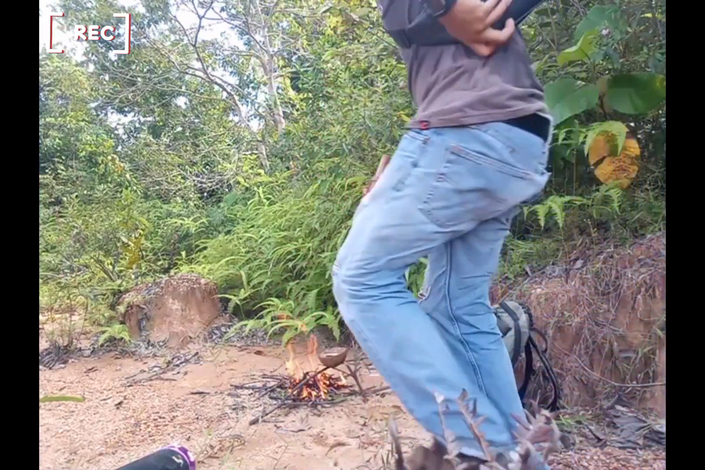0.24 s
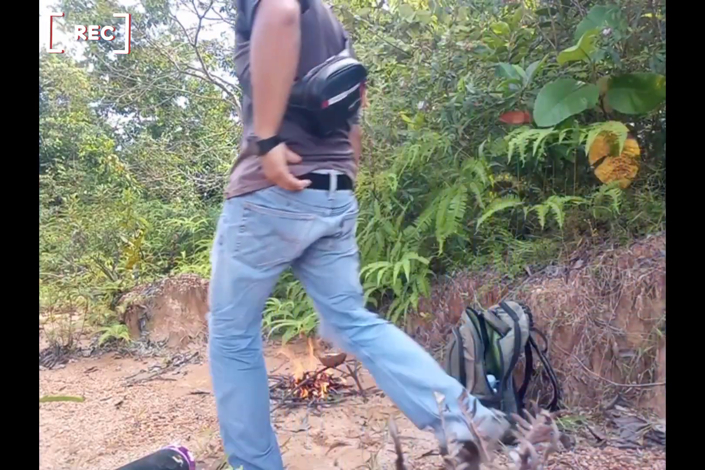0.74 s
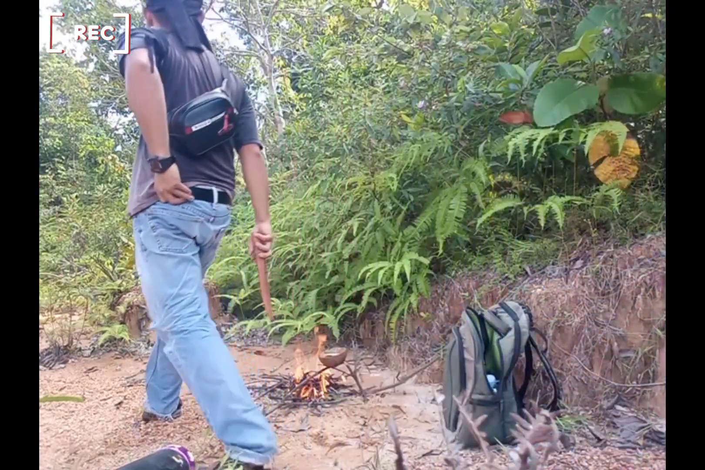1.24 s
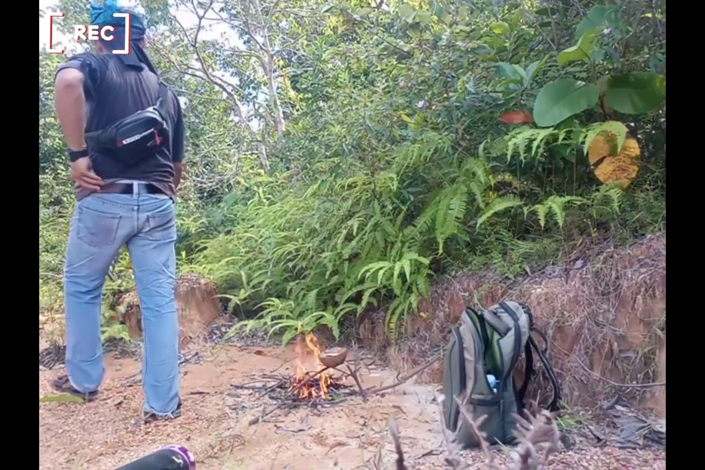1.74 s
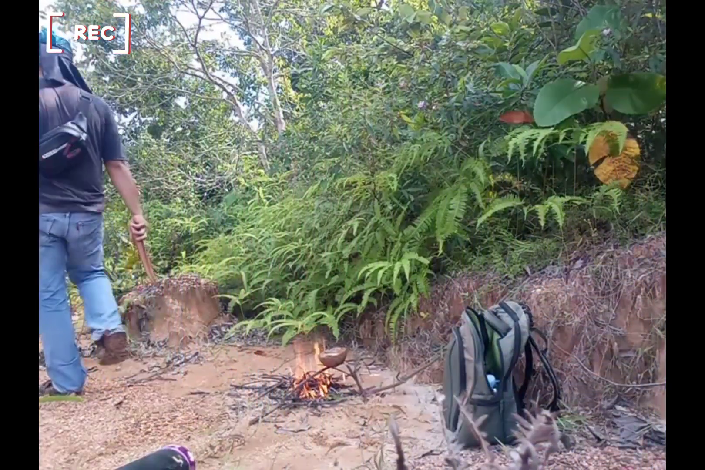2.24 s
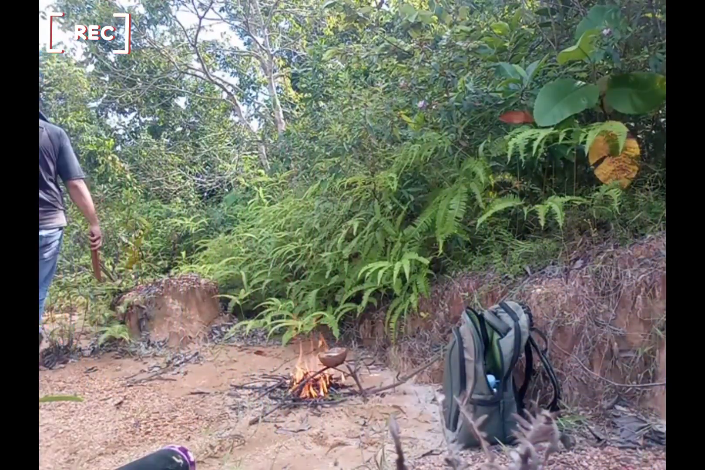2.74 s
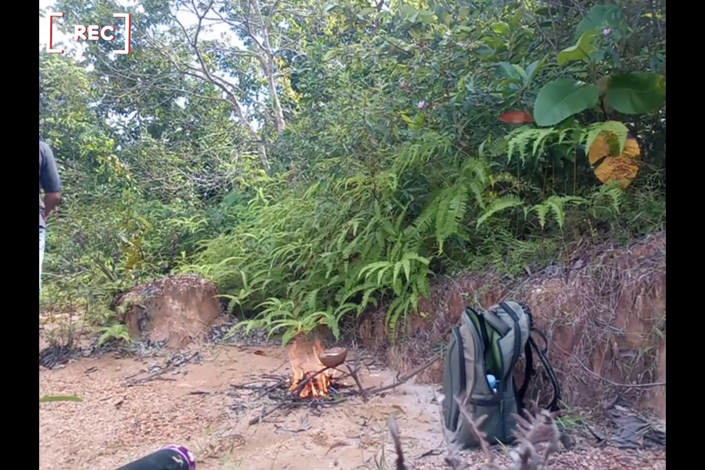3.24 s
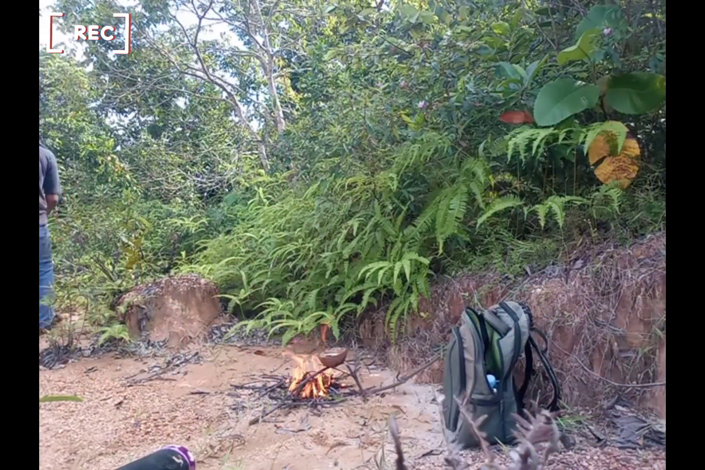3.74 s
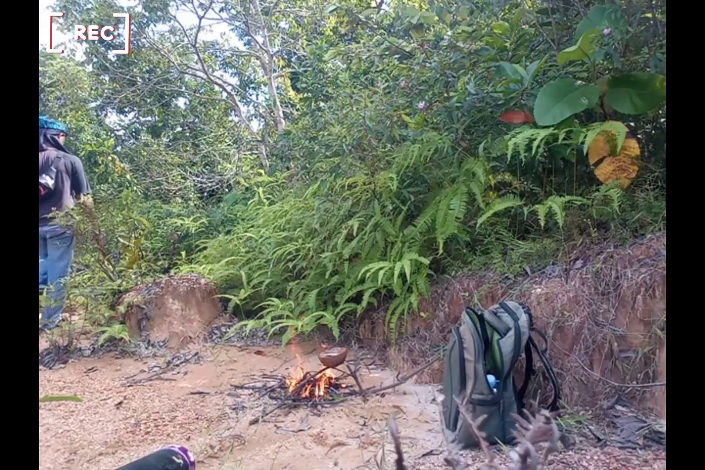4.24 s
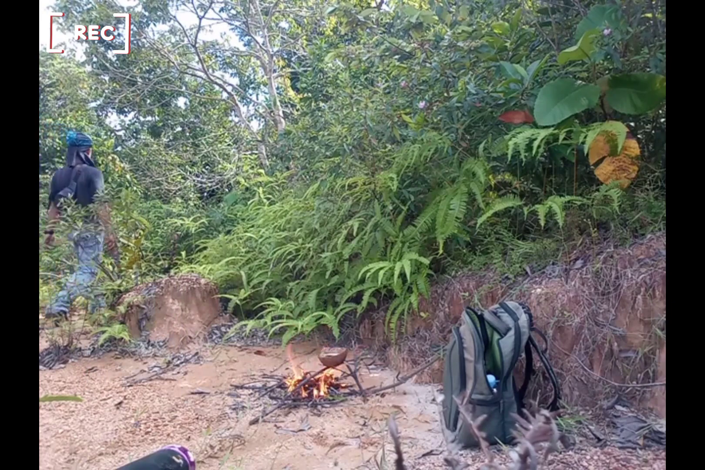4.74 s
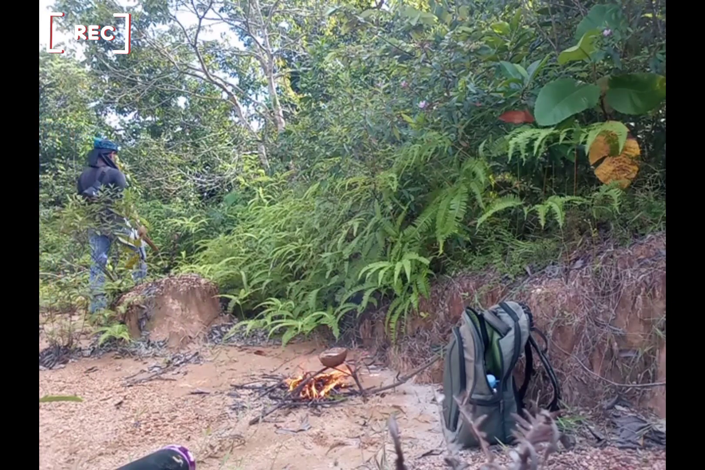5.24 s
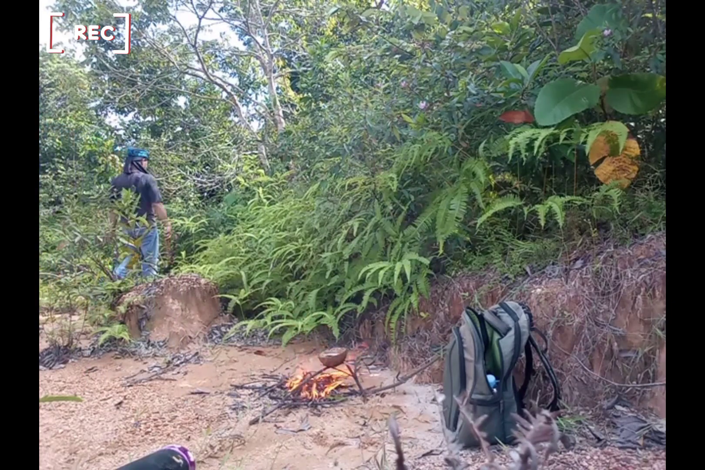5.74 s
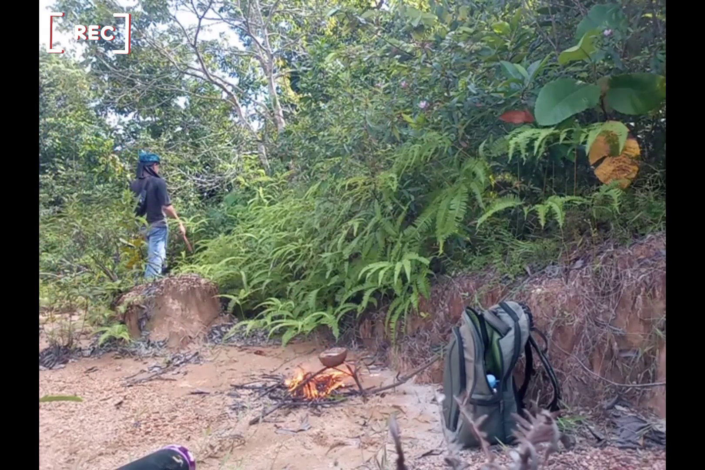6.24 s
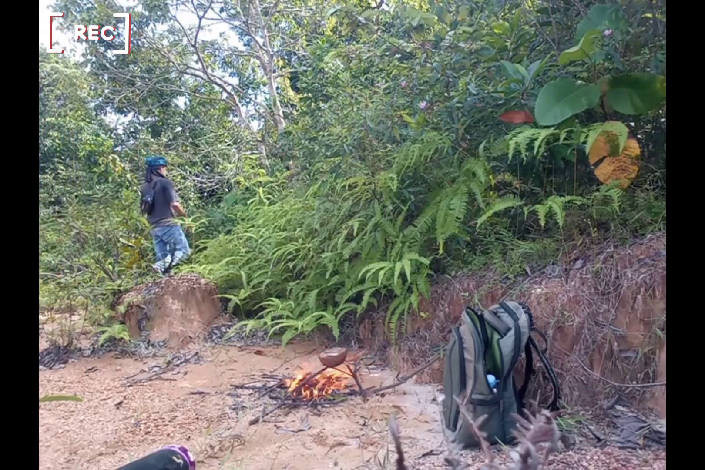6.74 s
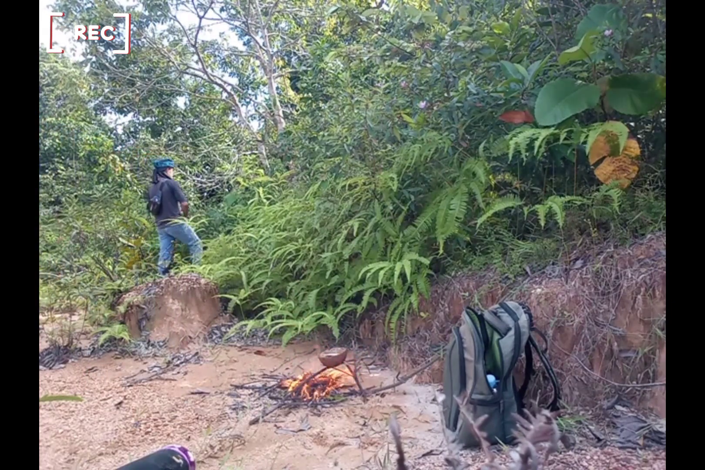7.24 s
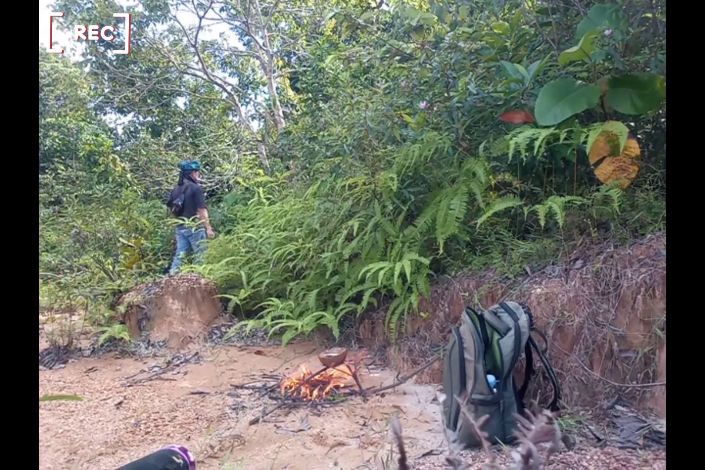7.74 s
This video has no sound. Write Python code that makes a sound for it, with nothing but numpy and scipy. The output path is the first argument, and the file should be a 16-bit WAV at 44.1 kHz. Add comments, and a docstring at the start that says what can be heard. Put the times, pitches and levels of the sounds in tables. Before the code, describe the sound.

Footsteps crunch over grit and dry leaves, one twig snapping sharply, then recede while cicadas drone and a low breeze rumbles on the microphone.

```python
"""A man's steps over grit, dry leaves and twigs recede in a forest clearing: grains of shaped noise,
with snaps as short noise bursts and knocks of a stick as ringing modes.
A cicada chorus drones as clicks through resonators; crickets, far birds and two tinks of a buckle are narrow noise.
The breeze rumbles on the microphone as low noise and makes its housing hum and moan; a faint hiss fills the forest."""
import sys
import numpy as np
from scipy import signal
from scipy.fft import rfft, irfft, next_fast_len
from scipy.io import wavfile
from scipy.ndimage import uniform_filter1d

SR = 44100
rng = np.random.default_rng(int(sys.argv[2]) if len(sys.argv) > 2 else 0)


def inscribe(sig):
    """Save sig as 16-bit PCM at rate SR to the path in sys.argv[1].

    A 1-D sig is mono; a 2-D sig holds one channel per row.
    Samples are clipped to [-1, 1] before scaling.
    """
    pcm = np.round(np.clip(np.atleast_2d(sig).T, -1, 1) * 32767)
    wavfile.write(sys.argv[1], SR, pcm.astype(np.int16))


N = 351918  # samples

# Feet in the litter. Each row: time when full level is reached in seconds (the rise comes before it),
# rise, hold and fall in seconds, crunch level in dB, then grit, twigs, dry fizz and sheen in dB over the crunch.
FOOTSTEPS = [(.32, 0.17, 0.035, .06, -64.5, -4.5, -10.5, -3, -13),
             (.375, 0.11, 0.036, 0.15, -55.5, -2.5, -8.5, -9, -13),
             (.525, 0.071, .01, .05, -68.5, -1, -22, -2, 5),
             (0.564, 0.069, 0.0062, 0.08, -63.5, 3, -8, -5, -13),
             (.75, 0.14, 0.028, 0.083, -58.5, -5.5, -4.5, -9, -12),
             (.81, 0.12, 0.053, .22, -63.5, 3, -1, -4, -14), (1.2, 0.24, .03, .02, -66.5, -12, -6, -9, -24),
             (1.238, 0.0098, 0.0041, 0.028, -37.5, -5.5, -4.5, -7, -8),
             (1.255, .015, 0.026, .08, -55, -6.5, -6, -4, -9), (1.3, .02, 0.023, .05, -54, -3, -3, -4, -11),
             (1.329, .012, 0.014, 0.048, -52, -3.5, -6, -5, -1),
             (1.35, 0.016, 0.0091, 0.071, -53.5, 0, -2.5, -6.5, -14),
             (1.4, 0.048, 0.081, 0.1, -58, -2, -4, -4.5, -13),
             (1.68, 0.06, 0.0065, 0.073, -61, -14, -4.5, -6.5, -14),
             (1.75, .08, 0.16, .04, -73, -25, -12, -1, -10),
             (1.888, .03, 0.072, .06, -55, -5.5, -10, -6, -9),
             (1.99, .06, 0.0058, 0.14, -52, -8, -7, -9.5, -17),
             (2.15, 0.49, 0.031, 0.15, -57.5, -4.5, -8.5, -10, -24),
             (2.3, 0.091, .2, .15, -70, -12.5, -17, -9, -25),
             (2.68, 0.45, .005, .03, -59.5, -19, -14.5, -10, -35),
             (2.699, 0.0089, 0.029, .1, -52.5, -17, -5, -12, -22),
             (2.76, 0.095, 0.045, 0.06, -63, -11, -9, -9, -24),
             (2.968, 0.036, .006, 0.11, -57, -23, -26, -16, -33), (3.1, .1, .3, .3, -76, -21, -6, -4, -22),
             (3.69, 0.11, .006, 0.048, -77, -19, -7, -16, -25),
             (3.8, 0.084, 0.15, 0.33, -73.5, -23, -15, 7, -5),
             (4.0, 0.63, 0.017, .2, -67.5, -16.5, -17, -10, -26),
             (4.16, 0.23, 0.0053, 0.088, -68, -21, -16, -6.5, -25),
             (4.605, 0.15, .008, 0.079, -62, -23, -16, -6.5, -25),
             (4.755, 0.2, 0.015, .28, -59, -20, -16, -8.5, -11),
             (5.08, 0.18, .006, 0.2, -80, -17, -20, -14, -12),
             (5.587, 0.025, 0.026, 0.21, -54, -10, -12.5, -11, -18),
             (6.455, .12, .01, 0.026, -72, -19, -11, 2.5, -16),
             (6.468, .006, 0.021, 0.14, -55.5, -29.5, -11.5, -1.5, -4),
             (6.69, 0.17, .006, 0.18, -68, -19, -22, -9, -23),
             (7.235, 0.0089, .005, 0.056, -74, -13, -17, 15, 16),
             (7.28, 0.11, .008, 0.097, -68.5, -28, -12, -8, -24),
             (7.66, 0.41, .006, .2, -78, -14, -9, 1, -11),
             (7.752, 0.019, 0.0036, 0.097, -64.5, -13, -9.5, 1.5, 1)]
# Faint stir between steps, before its slow wander: crunch, grit, twigs, fizz and sheen in dB.
REST_STIR_DB = (-85.5, -92.5, -91, -84, -90.5)
# Near heels grinding. Each row: time when full level is reached in seconds (the rise comes before it),
# hold in seconds, level in dB.
HEEL_GRINDS = [(0.343, 0.059, -64.5), (0.558, 0.0052, -56), (0.602, 0.14, -70), (0.86, .012, -70),
               (1.244, .004, -65), (1.346, 0.013, -55.5), (1.42, .006, -67), (1.976, 0.041, -79)]
HEEL_RISE_S, HEEL_FALL_S = 0.035, 0.04  # time to swell or fade by 30 dB
SAG_DB_PER_S = 31  # a held stroke slowly loses strength

# Spectra of the litter. Each row: frequency in Hz, relative density in dB per Hz.
HEEL_SPECTRUM = [(350, -22), (500, -7.5), (700, -3), (1000, -1.5), (1400, -54)]
GRIT_SPECTRUM = [(800, -19.5), (1150, -4), (1700, 0), (2500, -5), (3300, -18)]
TWIG_SPECTRUM = [(1900, -20), (2600, -1.5), (3300, 1), (4100, 0), (5200, -11)]
CRUNCH_SPECTRUM = [(3300, -25), (4300, -4), (5500, 4), (7500, 5.5), (9000, -29.5), (10500, -29)]
FIZZ_SPECTRUM = [(7000, -35), (8800, -1.5), (10200, -2.5), (11400, -11.5), (12600, -38)]
SHEEN_SPECTRUM = [(10500, -18), (12000, -0.5), (14000, -3), (16500, 2)]

# Snapping fibres. Each row: start in seconds, bright peak in dB, bright centre in Hz,
# woody peak in dB, woody pitch in Hz, tearing time in ms.
FIBRE_SNAPS = [(0.3092, -49, 13100, -58, 5950, 2.5), (0.5643, -61, 11900, -37.5, 680, 1.1),
               (0.6709, -48.5, 9880, -51, 784, 4.2), (0.706, -64, 12000, -49.5, 2370, 4),
               (0.737, -52, 10100, -50, 4840, 2.3), (0.912, -52, 9280, -63, 1930, 2.5),
               (1.2323, -17.5, 9770, -28.5, 4840, 7.1), (1.3, -41, 9400, -50, 6170, 2.5),
               (1.3311, -37, 9400, -44.5, 900, 6.3), (1.66, -49, 9560, -52, 6400, 2.63),
               (1.8846, -59, 10000, -35.5, 6300, 2.8), (1.947, -44, 10200, -46, 6290, 1.2),
               (2.199, -68, 9240, -38, 5830, 2.3), (2.5069, -54, 9650, -72, 6300, 2.2),
               (2.7014, -59, 9610, -55, 4950, 2.5), (2.8013, -55, 9150, -50, 6100, 2.5),
               (2.8674, -53, 10300, -76, 5400, 2.7), (2.9292, -46, 9700, -73, 6300, 1.5),
               (2.9467, -51, 10000, -54, 6200, 2.1), (3.4074, -43, 13000, -77, 654, 1.6),
               (3.8, -45, 9500, -85, 5780, 5.2), (3.878, -48, 9900, -75, 5640, 2.5),
               (4.6954, -50, 9000, -78, 6260, 2.7), (5.1095, -47.5, 11000, -70, 3120, 1.8),
               (5.5889, -61, 10000, -45, 1580, 2.3), (5.9593, -60, 8800, -81, 641, 2.5),
               (6.0841, -61, 12400, -78, 797, 2.6), (6.466, -40.5, 11400, -42.5, 5700, 3.2),
               (7.2315, -47.5, 10310, -75, 5500, 2.2), (7.5138, -54, 10100, -84, 700, 2.3),
               (7.613, -53, 9990, -73, 6150, 2.5), (7.7495, -51, 11200, -66, 5870, 2.6)]
# Knocks of a dry stick. Each row: start in seconds, peak of the ring in dB, peak of the bright tick in dB.
STICK_KNOCKS = [(1.674, -42.5, -44), (1.783, -55, -69), (1.81, -52, -35.5), (1.8479, -36.5, -41)]
# Modes of the stick. Each row: frequency in Hz, relative level in dB, ring time scale in seconds.
STICK_MODES = [(1660, -4.5, 0.031), (3300, -1, 0.021), (4820, -0.5, .02), (6480, 5, 0.0058),
               (9860, -6, 0.011)]

# Cicada choirs. Each row: body resonance in Hz, width in Hz, level in dB, throbs per second, throb depth 0-1.
CICADA_CHOIRS = [(7460, 566, -58.5, 79, 0), (7058, 795, -61.5, 140, 0), (8676, 200, -77, 42, 0),
                 (8160, 1200, -75, 33, .3), (15080, 480, -76, 34, 0.2), (15500, 440, -83, 15, 0),
                 (14300, 1200, -87.5, 11, 0.9)]
# Cricket trills. Each row: start in seconds, length in seconds, first and last pitch in Hz,
# level in dB before fades and flutter.
CRICKET_TRILLS = [(0.422, 0.74, 11680, 11700, -80), (1.04, 0.52, 11750, 11640, -82),
                  (3.358, 0.53, 12200, 12400, -100), (4.247, 0.42, 11860, 11830, -86),
                  (5.25, 0.66, 11620, 11620, -80), (6.553, 0.67, 11900, 12070, -86),
                  (7.168, 0.26, 12280, 12290, -92), (7.6, 0.39, 11860, 11900, -85)]
# Far bird notes, and two thin metal tinks of a buckle near 14 kHz. Each row: start in seconds,
# length in seconds, first and last pitch in Hz, level in dB before fades, blur in Hz.
CHIPS_AND_TINKS = [(0.522, 0.0041, 13900, 13900, -45.5, 900), (0.54, 0.014, 14100, 14100, -55, 900),
                   (0.594, 0.075, 890, 874, -72, 250), (1.054, 0.17, 2200, 2380, -73.5, 200),
                   (1.091, 0.036, 3600, 3530, -75, 150), (3.725, 0.036, 1940, 2170, -74, 150),
                   (0.188, 0.086, 2100, 1920, -89, 200), (0.462, 0.092, 1930, 1940, -75, 250),
                   (1.699, 0.19, 2740, 2760, -80, 250), (1.722, 0.11, 4900, 4900, -72, 300),
                   (4.368, 0.19, 3000, 2940, -84, 40), (5.112, 0.05, 3060, 2950, -66, 300),
                   (5.119, 0.072, 2680, 2740, -72, 300), (5.1, 0.021, 1938, 2187, -74.5, 200),
                   (5.116, 0.027, 1480, 1460, -76, 200), (5.379, 0.081, 2900, 2880, -86, 40.5),
                   (5.458, .025, 2120, 2130, -83, 80), (5.464, 0.051, 3050, 3100, -75, 60),
                   (5.6, 0.059, 3580, 3570, -60.5, 500), (5.705, 0.054, 1030, 990, -74.5, 400),
                   (5.733, 0.027, 2400, 2350, -80, 60), (5.74, 0.082, 3630, 3660, -79, 60),
                   (5.778, 0.051, 2333, 2320, -67, 59.6), (6.005, 0.058, 3220, 3540, -77, 122),
                   (6.627, 0.079, 2980, 3200, -80, 150), (6.679, 0.044, 4950, 4950, -72, 250),
                   (4.548, 0.055, 4850, 5030, -71, 500), (7.257, 0.024, 3550, 3740, -78, 200),
                   (7.599, 0.28, 2950, 2880, -86, 40)]

# Strength of the breeze. Each row: time in seconds, hum level in dB, buffeting level in dB, before fast wander.
BREEZE_LEVELS = [(0.0, -46.5, -56), (0.11, -53, -61.5), (0.26, -60.5, -57.5), (0.44, -55, -68),
                 (0.51, -49.5, -59.5), (1.04, -49, -60.5), (1.44, -54.5, -61.5), (2.09, -48.5, -58),
                 (2.4, -49, -60.5), (2.58, -64.5, -66), (2.73, -53, -54), (3.13, -56, -63),
                 (3.49, -54, -61), (3.65, -78, -70.5), (3.75, -59.5, -67), (4.07, -57, -65.5),
                 (4.35, -58, -55), (4.42, -67.5, -72), (4.76, -52.5, -54), (4.95, -58, -70.5),
                 (5.09, -66.5, -63.5), (5.22, -52, -57), (5.55, -58, -67.5), (5.6, -49.5, -55.5),
                 (5.93, -61.5, -67.5), (6.0, -55, -58), (6.14, -77, -70), (6.42, -70.5, -67),
                 (6.51, -53.5, -57.5), (6.87, -47.5, -60.5), (7.42, -60, -64), (7.78, -46.5, -62),
                 (7.96, -51.5, -61.5), (7.98, -54, -70)]
HUM_HZ, HUM_SAG_HZ_PER_S = 93.43, 0.74  # the hum slowly sinks
# Swells of the low moan. Each row: time when full level is reached in seconds (the rise comes before it),
# hold in seconds, level in dB, pitch in Hz.
MOAN_SWELLS = [(0.167, 0.05, -64.5, 308), (0.568, 0.015, -56.5, 374), (.87, .02, -74, 360),
               (1.902, 0.038, -57, 290), (2.448, 0.24, -69, 347), (2.963, 0.17, -69, 324),
               (5.082, 0.04, -71.5, 293), (5.528, .03, -70.5, 270), (7.212, .03, -69, 407),
               (7.634, .03, -69, 372), (7.852, 0.033, -59, 343)]
MOAN_RISE_S, MOAN_FALL_S = 0.12, 0.16  # time to swell or fade by 30 dB
MOAN_REST_DB = -80  # level between swells
# Spectrum of the buffeting. Each row: frequency in Hz, relative density in dB per Hz.
BUFFET_SPECTRUM = [(8.8, -40), (15, -12.5), (32, -34), (65, -5), (94, -7.5), (112, -1), (135, 1),
                   (208, -10.5), (271, -26.5), (800, -42.5), (1040, -57), (1760, -120)]
# Spectrum of the forest hiss. Each row: frequency in Hz, relative density in dB per Hz.
HISS_SPECTRUM = [(200, 9), (300, -5.5), (600, -8.5), (1100, -17), (3000, -24), (6200, -23), (9200, -17),
                 (12500, -33), (16500, -23)]
HISS_DB = -76
EDGE_HZ = 15500  # upper band limit


def amp(db):
    """Level is logarithmic: decibels to gain."""
    return 10 ** (np.asarray(db) / 20)


def evened(x):
    """Mean power sets level: scales to rms 1."""
    return x / np.sqrt(np.mean(x ** 2) + 1e-20)


def noise():
    """White noise holds equal power per Hz; one draw per sample."""
    return rng.standard_normal(N)


def curves(rows):
    """Linear interpolation: the columns of a time table, sample by sample."""
    s, *columns = np.transpose(rows)
    return [np.interp(np.arange(N) / SR, s, column) for column in columns]


def coloured(x, points):
    """Spectral shaping: weights each frequency, at -120 dB outside the end points; rms 1."""
    size = next_fast_len(len(x))
    f, db = np.transpose(points)
    hz = np.fft.rfftfreq(size, 1 / SR)
    gain = amp(np.interp(np.log(hz + 1), np.log(f + 1), db, -120, -120))
    return evened(irfft(rfft(x, size) * gain, size)[:len(x)])


def resonate(x, hz, width):
    """Heterodyne resonance: shifts the curve hz to zero, smooths twice (width in Hz) and shifts back."""
    turn = np.exp(2j * np.pi * np.cumsum(hz * np.ones(len(x))) / SR)
    r = np.exp(-np.pi * width / SR)
    smooth = signal.lfilter([(1 - r) ** 2], [1, -2 * r, r * r], x / turn)
    return 2 * (turn * smooth).real


def wander(seconds):
    """Running averages leave only slow fluctuation: chance of rms 1."""
    size = round(seconds * SR)
    return evened(uniform_filter1d(uniform_filter1d(noise(), size), size))


def add(mix, s, sound):
    """Superposition: mixes a sound in at second s."""
    part = mix[round(s * SR):][:len(sound)]
    part += sound[:len(part)]


def strokes(s, rise, hold, fall, db, rest_db):
    """Powers of events add: gain that rises up to s, holds and falls (30 dB in rise or fall s) over a rest."""
    t = np.arange(0, N / SR + 0.002, 0.001)[:, None]  # one row per ms, one column per event
    held = np.clip(t - s, 0, hold)
    slope = np.minimum(t - s, 0) / rise - np.maximum(t - s - hold, 0) / fall
    power = amp(db + 30 * slope - SAG_DB_PER_S * held) ** 2
    event_power = np.interp(np.arange(N) / SR, t[:, 0], power.sum(axis=1))
    return np.sqrt(event_power + amp(rest_db) ** 2)


def grains(colour, per_s, spread_db, ring_db):
    """Granular friction: random tiny breaks over steady noise ring in narrow patches of pitch."""
    size = amp(spread_db * np.minimum(rng.exponential(1, N), 4))
    breaks = evened(size * (rng.random(N) < per_s / SR) * noise())
    z = signal.stft(breaks + 1.52 * noise(), nperseg=512, noverlap=384)[2]
    patches = uniform_filter1d(rng.standard_normal(z.shape), size=2, axis=0)  # across frequency
    patches = uniform_filter1d(patches, size=12, axis=1)  # across time
    rung = signal.istft(z * amp(ring_db * evened(patches)), nperseg=512, noverlap=384)[1][:N]
    return coloured(rung, colour)


def scuff():
    """Contact noise by layer: the heel grinds low, grit, twigs and leaves crunch, dry edges fizz."""
    s, rise, hold, fall, db, *over = np.transpose(FOOTSTEPS)
    stir = 3.0 * wander(0.04)  # dB
    crunch, grit, twigs, fizz, sheen = (
        strokes(s, rise, hold, fall, db + offset, rest + stir)
        for offset, rest in zip([0, *over], REST_STIR_DB))
    s, hold, db = np.transpose(HEEL_GRINDS)
    heel = strokes(s, HEEL_RISE_S, hold, HEEL_FALL_S, db, -99)
    out = heel * grains(HEEL_SPECTRUM, 1700, 3.6, 0.84)
    # each layer flickers by its own rms dB and pace
    out += grit * grains(GRIT_SPECTRUM, 2500, 2.5, 5.3) * amp(0.72 * wander(0.0062))
    out += twigs * grains(TWIG_SPECTRUM, 2500, 2.5, 4.4) * amp(1.05 * wander(0.02))
    out += crunch * grains(CRUNCH_SPECTRUM, 3000, 6.3, 4.9) * amp(0.97 * wander(0.0073))
    out += fizz * grains(FIZZ_SPECTRUM, 2500, 2.5, 5.3) * amp(1.37 * wander(0.01))
    out += sheen * grains(SHEEN_SPECTRUM, 2200, 1.2, 1.0) * amp(2.3 * wander(0.0082))
    return out


def snaps():
    """Brittle fracture: tearing fibres give a woody knock and a bright spit, with a short leafy tail."""
    out, t = np.zeros(N), np.arange(round(0.15 * SR)) / SR
    for s, bright_db, bright_hz, woody_db, woody_hz, tear_ms in FIBRE_SNAPS:
        a, b, c = rng.standard_normal((3, len(t)))
        after = np.maximum(t - tear_ms / 1000, 0)
        fibres = amp(3 * evened(uniform_filter1d(c, size=30)))  # uneven tearing
        onset = np.minimum(t / (0.00024 * tear_ms), 1)  # full after 24 % of the tearing
        tail = amp(-18.5 - 60 * after / 0.1)
        shape = onset * (fibres * amp(-60 * after / 0.015) + tail)
        spit = resonate(a, bright_hz, 0.2 * bright_hz) + 0.097 * np.diff(a, prepend=0)
        bright = evened(spit) * shape
        woody = resonate(np.diff(b, prepend=0), woody_hz, 0.37 * woody_hz + 300) * shape
        add(out, s, amp(bright_db) * bright / abs(bright).max() + amp(woody_db) * woody / abs(woody).max())
    return out


def knocks():
    """Modal excitation: each knock is a short rough blow that sets the stick's modes ringing."""
    out, t = np.zeros(N), np.arange(round(0.08 * SR)) / SR
    for s, db, tick_db in STICK_KNOCKS:
        rough = rng.standard_normal(len(t))
        blow = rough * amp(-60 * t / 0.03)
        ring = sum(amp(mode_db) * evened(resonate(blow, hz, 6.1 / ring_s))
                   for hz, mode_db, ring_s in STICK_MODES)
        tick = evened(resonate(rough, 10600, 6100)) * amp(-60 * t / 0.0087)
        add(out, s, amp(db) * ring / abs(ring).max() + amp(tick_db) * tick / abs(tick).max())
    return out


def cicadas():
    """Impulse-driven resonance: a dense hail of tymbal clicks rings one body per choir, throbbing loosely."""
    out = np.zeros(N)
    for hz, width, db, per_s, depth in CICADA_CHOIRS:
        clicks = noise() * (rng.random(N) < 0.15)
        beat = np.sin(2 * np.pi * np.cumsum(per_s * (1 + 0.15 * wander(0.11))) / SR)
        throb = (1 + depth * beat) * amp(0.73 * wander(0.36))
        body = resonate(resonate(clicks * throb, hz, width), hz, width)
        out += amp(db) * evened(body)
    return out


def narrow_note(length, first_hz, last_hz, db, blur_hz):
    """Narrow-band noise: a note on a straight glide, broken up and blurred in pitch."""
    size = round(length * SR)
    hz = np.linspace(first_hz, last_hz, size)
    note = resonate(rng.standard_normal(size), hz, blur_hz)
    return amp(db) * evened(note) * signal.windows.tukey(size, 0.6)


def crickets():
    """Amplitude fluctuation: thin high notes flutter as the air moves."""
    out = np.zeros(N)
    for s, *note in CRICKET_TRILLS:
        add(out, s, narrow_note(*note, 40))
    return out * amp(3 * wander(0.03))


def birds_and_buckle():
    """Narrow-band tones: far birds chip in short glides, and a buckle gives two thin metal tinks."""
    out = np.zeros(N)
    for s, *note in CHIPS_AND_TINKS:
        add(out, s, narrow_note(*note))
    return out


def housing_hum():
    """Cavity resonance: the housing hums like a blown bottle, with a weak octave and a low push."""
    hum_db, _ = curves(BREEZE_LEVELS)
    hz = HUM_HZ - HUM_SAG_HZ_PER_S * np.arange(N) / SR + 2.816 * wander(0.0397)
    turns = 2 * np.pi * np.cumsum(hz) / SR
    hum = np.sqrt(2) * (np.sin(turns) + amp(-22.5) * np.sin(2 * turns)) * amp(1.46 * wander(0.054))
    push = evened(resonate(noise(), 69, 30))  # low pressure noise that swells with the hum
    return amp(hum_db) * (hum + amp(-9.5) * push)


def moan():
    """Resonance of moving pitch: a low band of noise swells and fades."""
    s, hold, db, hz = np.transpose(MOAN_SWELLS)
    band = evened(resonate(noise(), np.interp(np.arange(N) / SR, s, hz), 130))
    return band * strokes(s, MOAN_RISE_S, hold, MOAN_FALL_S, db, MOAN_REST_DB)


def buffeting():
    """Turbulent pressure: the breeze rumbles on the microphone as lumpy low noise."""
    _, buffet_db = curves(BREEZE_LEVELS)
    lumps_db = 3.37 * wander(0.011) + 1.5 * wander(0.06)
    return amp(buffet_db + lumps_db) * coloured(noise(), BUFFET_SPECTRUM)


def forest_hiss():
    """Stationary noise: a steady faint hiss of the forest."""
    return amp(HISS_DB) * coloured(noise(), HISS_SPECTRUM)


def scene():
    """Superposition of every source at the microphone, one channel."""
    steps = scuff() + snaps() + knocks()
    high_notes = cicadas() + crickets() + birds_and_buckle()
    breeze = housing_hum() + moan() + buffeting()
    return (steps + high_notes + breeze + forest_hiss())[None]


def record(dry):
    """Band limitation: a linear-phase low-pass removes what lies above the edge."""
    lowpass = signal.firwin(1023, EDGE_HZ, window=("kaiser", 7), fs=SR)
    return signal.oaconvolve(dry, lowpass[None], "same")


dry = scene()
out = record(dry)
inscribe(out)
```